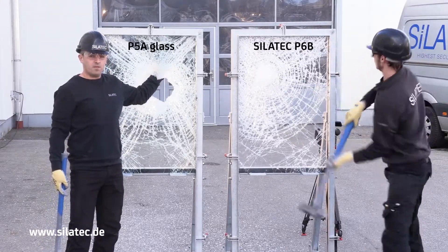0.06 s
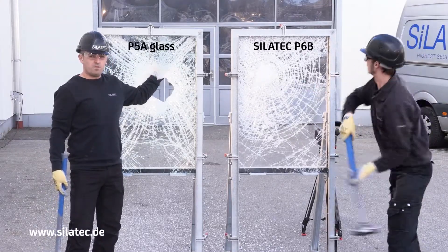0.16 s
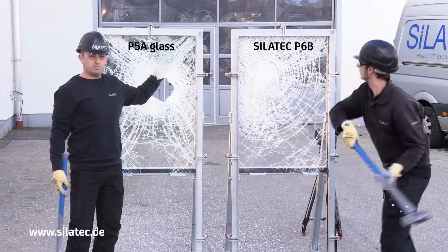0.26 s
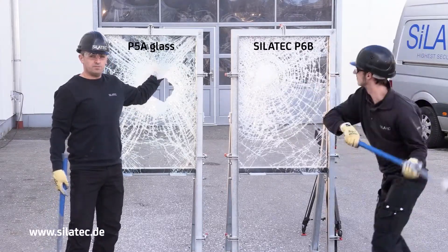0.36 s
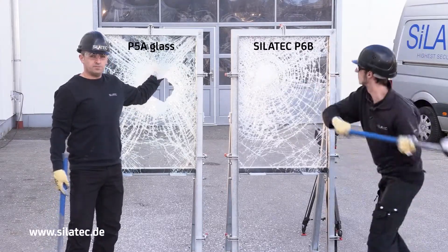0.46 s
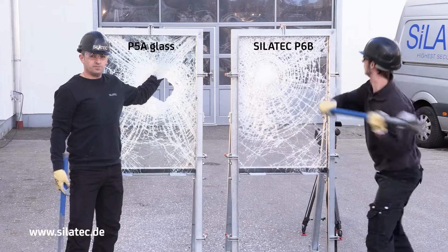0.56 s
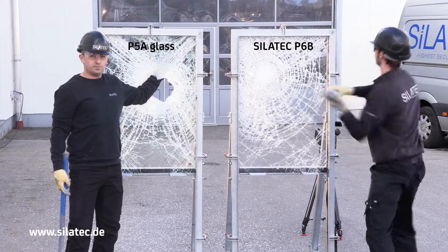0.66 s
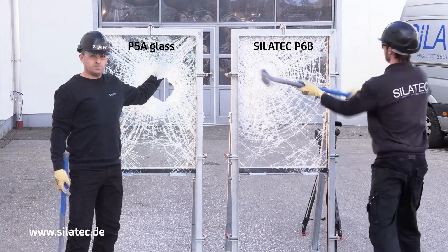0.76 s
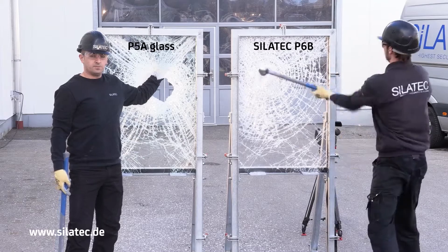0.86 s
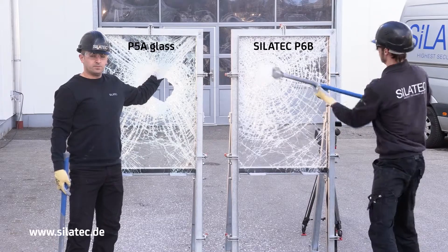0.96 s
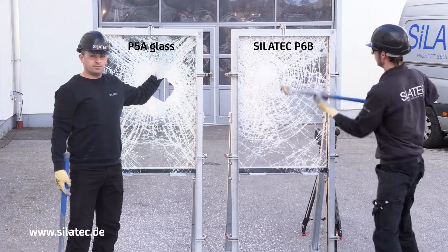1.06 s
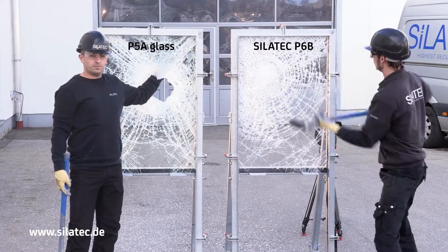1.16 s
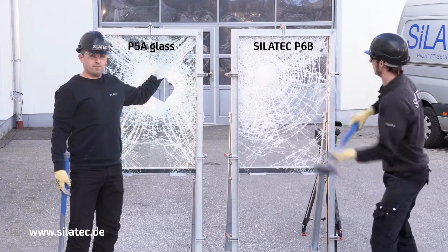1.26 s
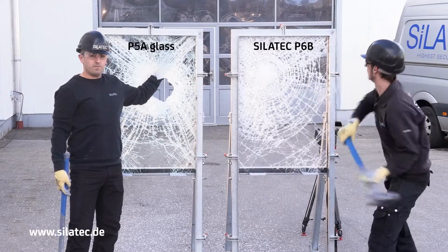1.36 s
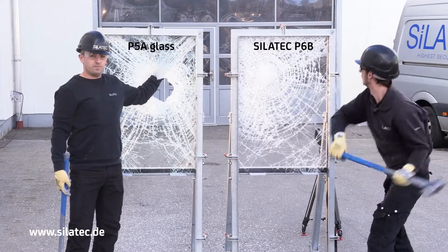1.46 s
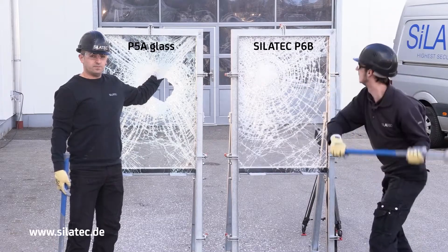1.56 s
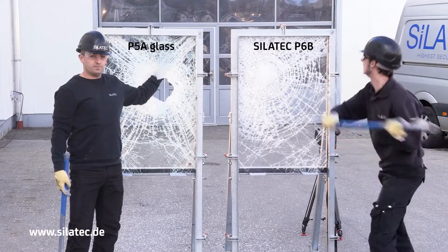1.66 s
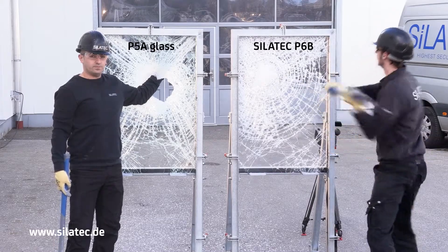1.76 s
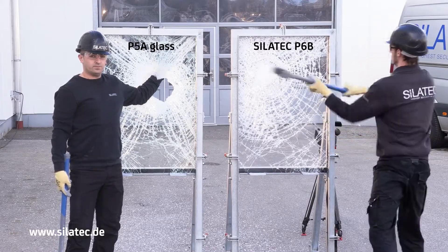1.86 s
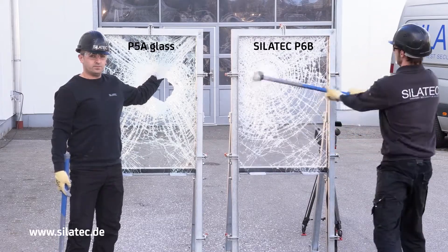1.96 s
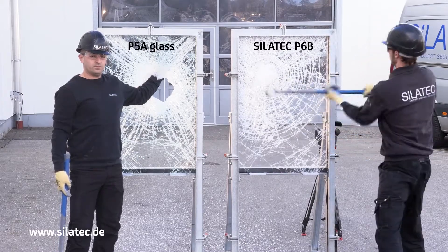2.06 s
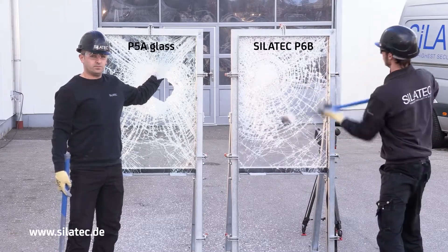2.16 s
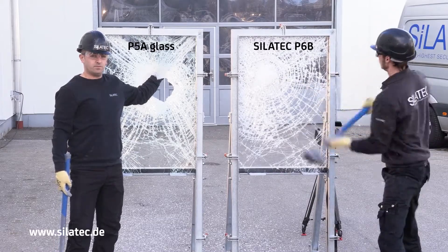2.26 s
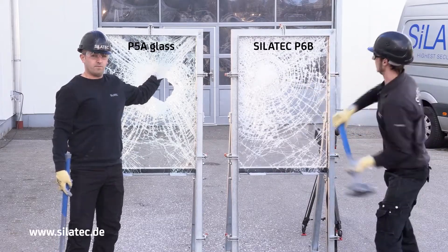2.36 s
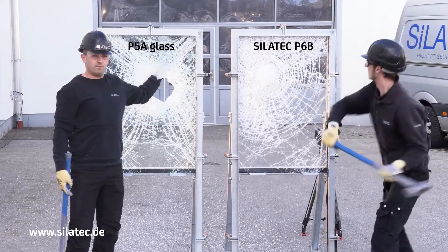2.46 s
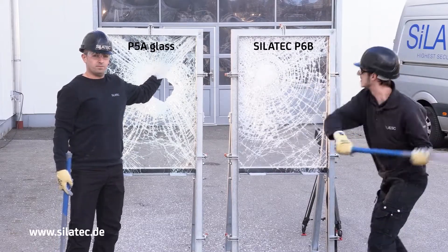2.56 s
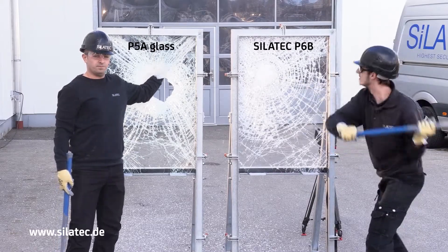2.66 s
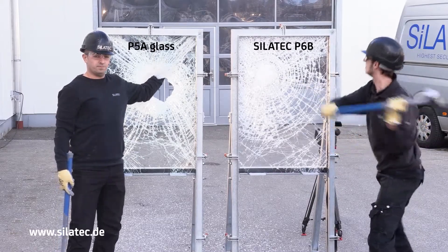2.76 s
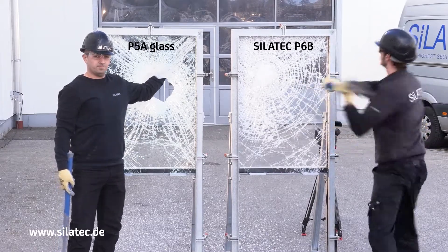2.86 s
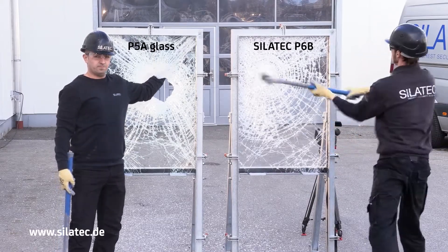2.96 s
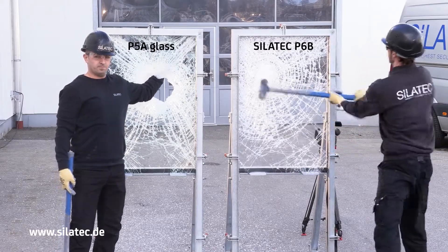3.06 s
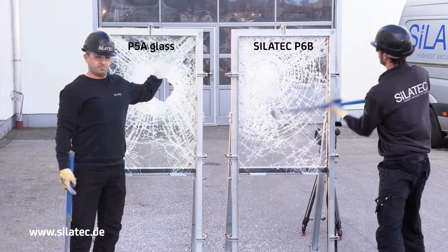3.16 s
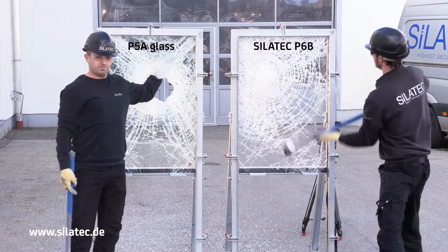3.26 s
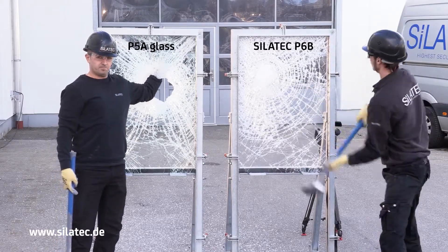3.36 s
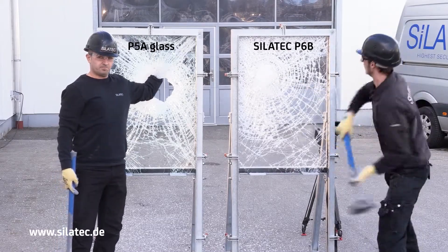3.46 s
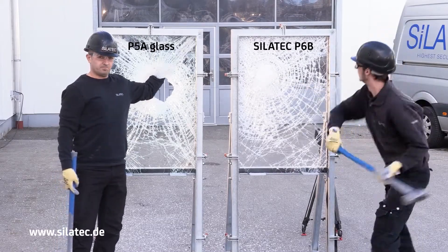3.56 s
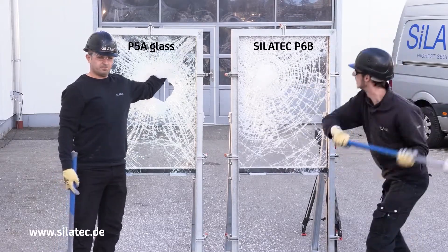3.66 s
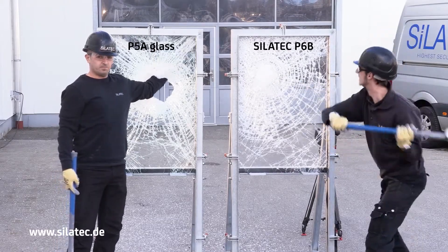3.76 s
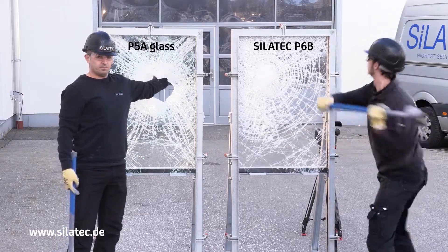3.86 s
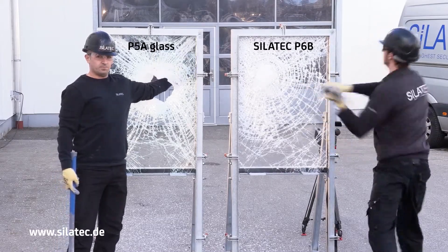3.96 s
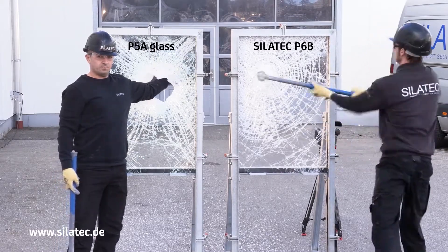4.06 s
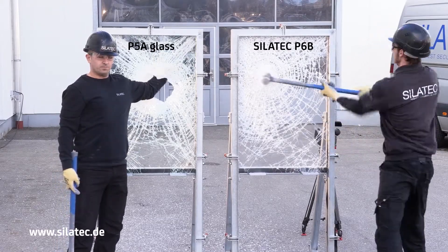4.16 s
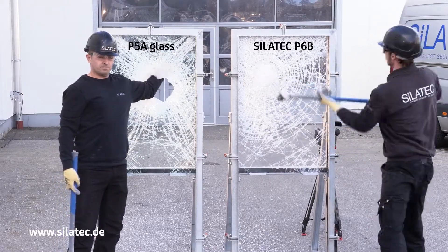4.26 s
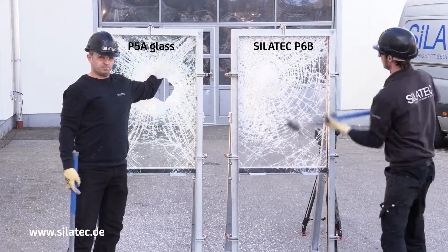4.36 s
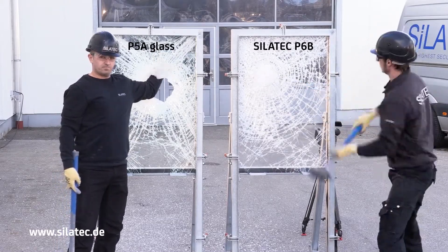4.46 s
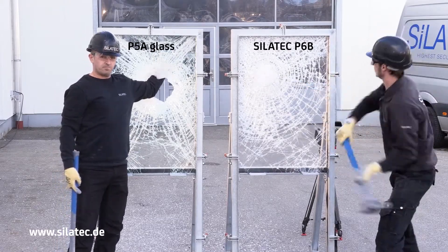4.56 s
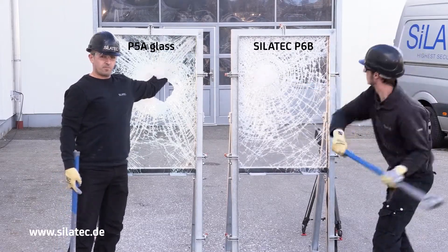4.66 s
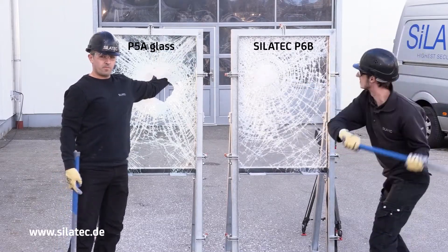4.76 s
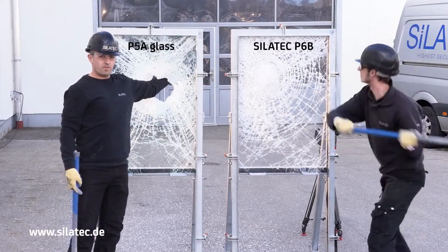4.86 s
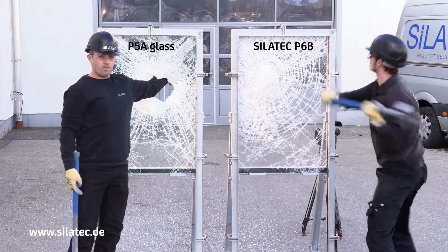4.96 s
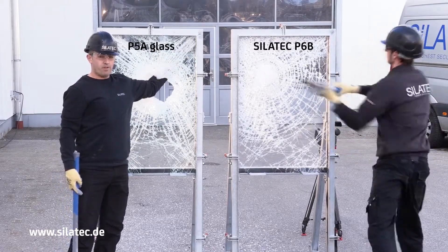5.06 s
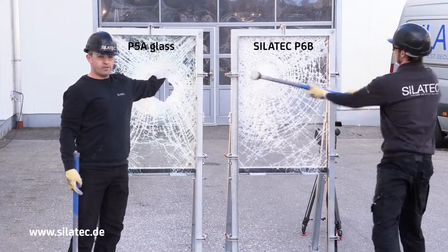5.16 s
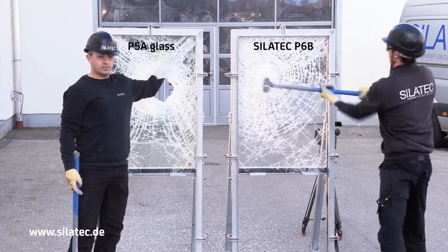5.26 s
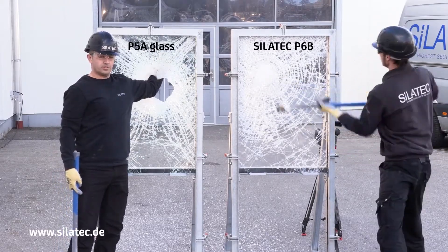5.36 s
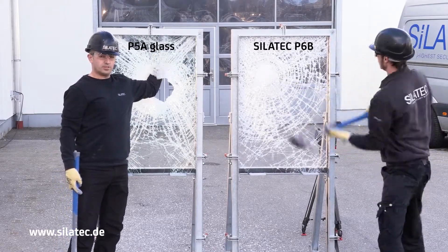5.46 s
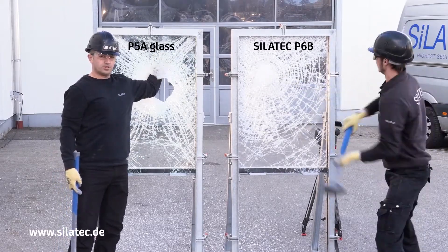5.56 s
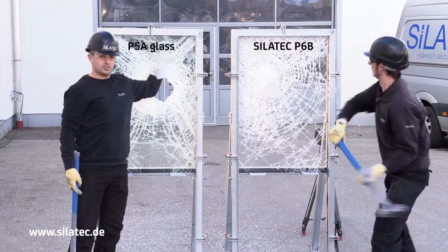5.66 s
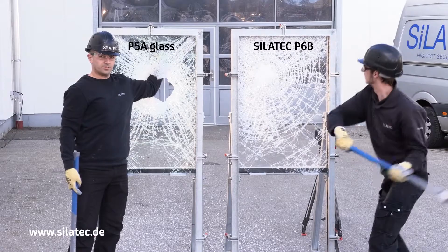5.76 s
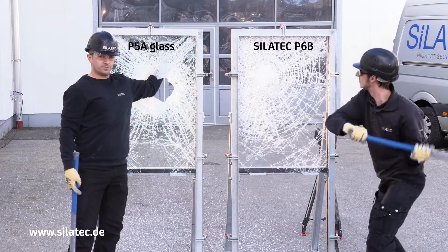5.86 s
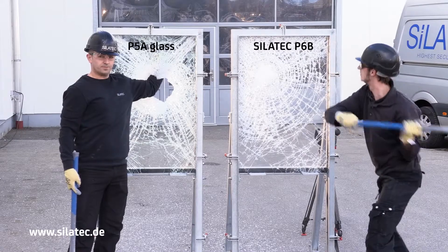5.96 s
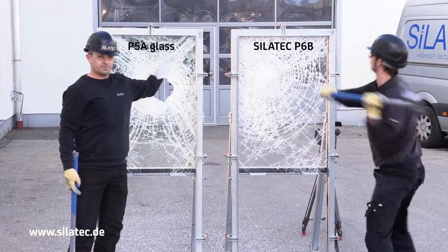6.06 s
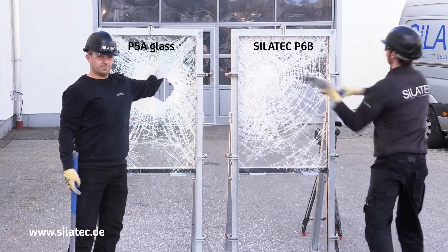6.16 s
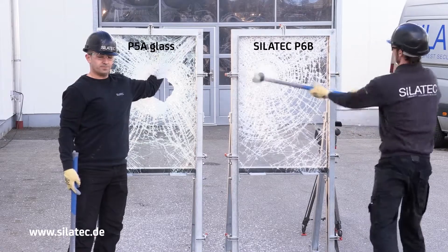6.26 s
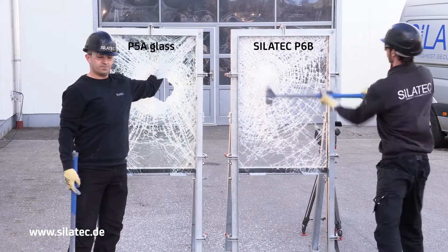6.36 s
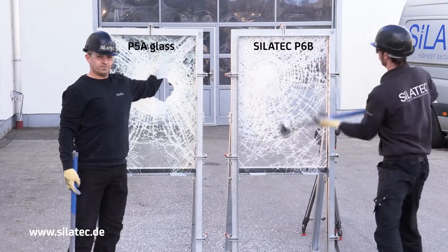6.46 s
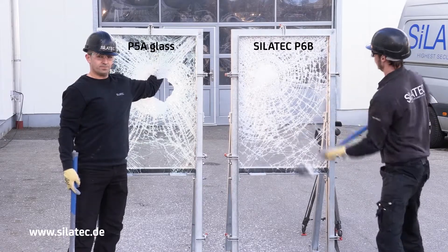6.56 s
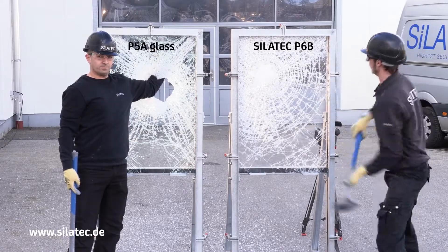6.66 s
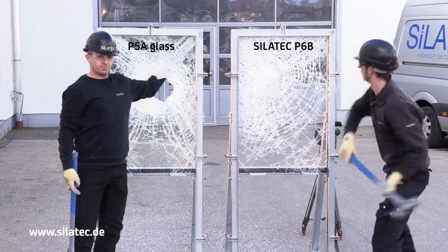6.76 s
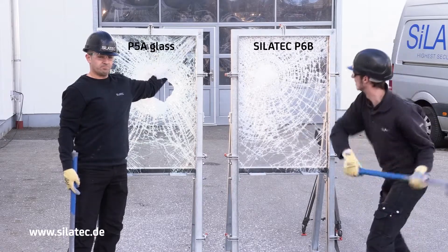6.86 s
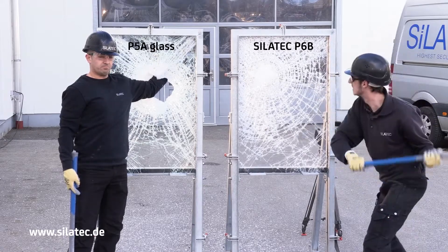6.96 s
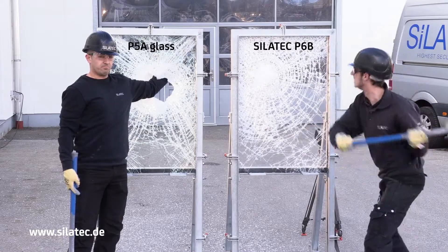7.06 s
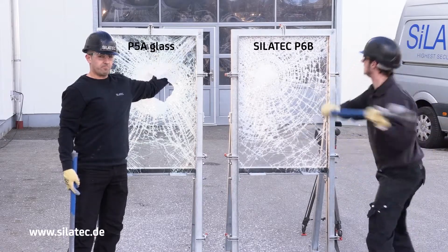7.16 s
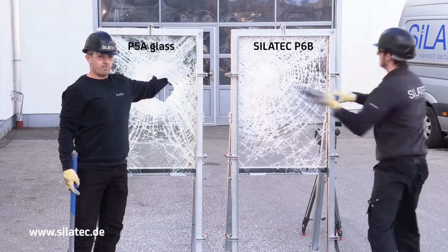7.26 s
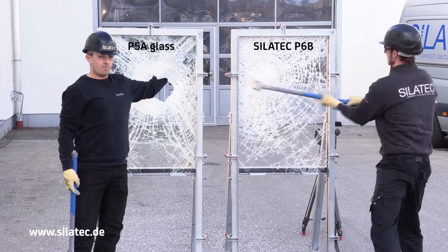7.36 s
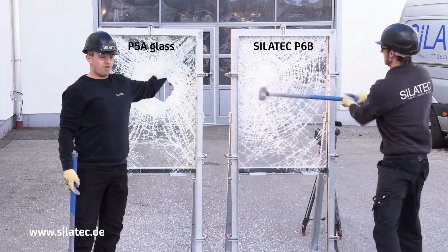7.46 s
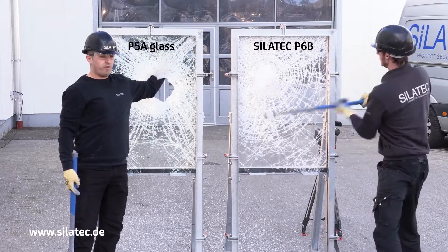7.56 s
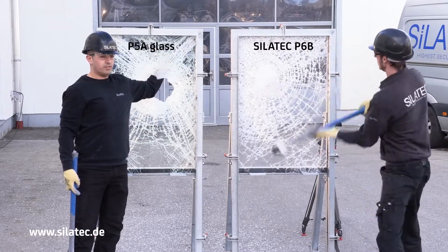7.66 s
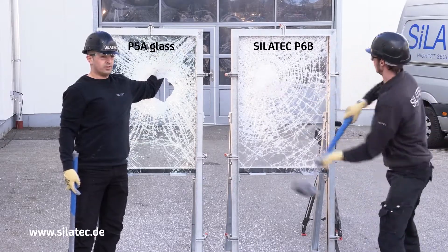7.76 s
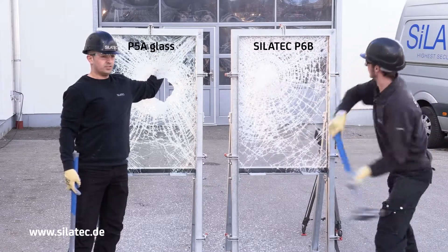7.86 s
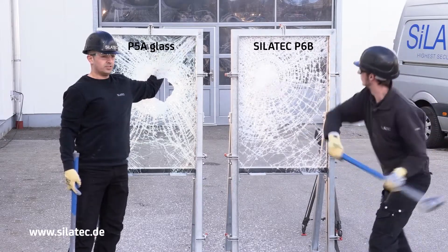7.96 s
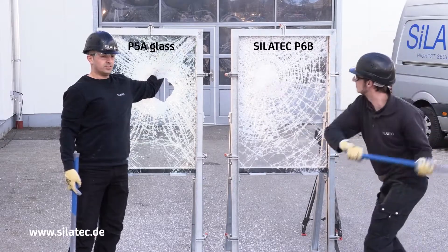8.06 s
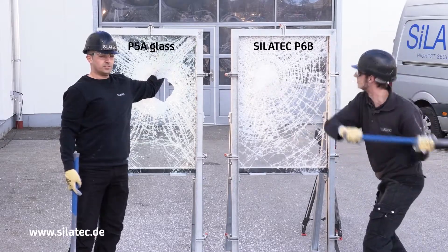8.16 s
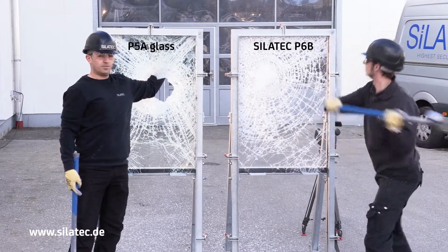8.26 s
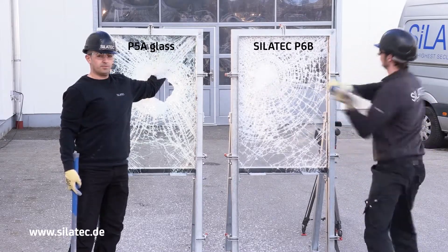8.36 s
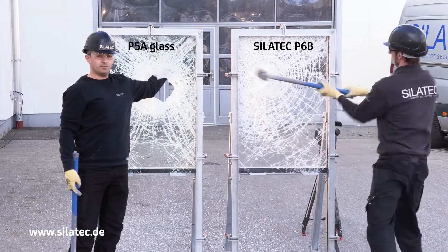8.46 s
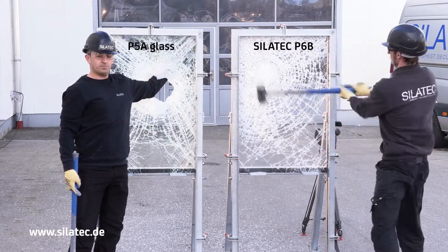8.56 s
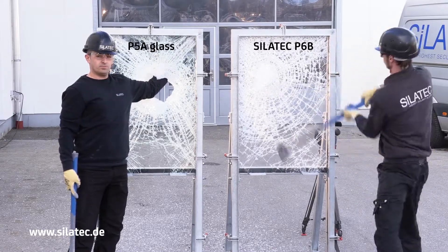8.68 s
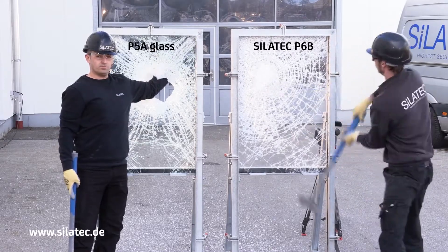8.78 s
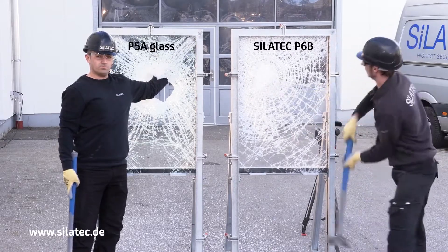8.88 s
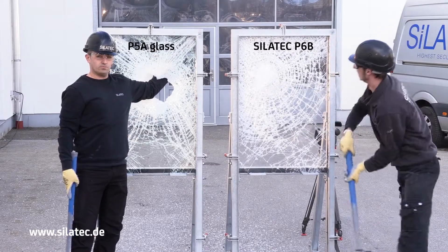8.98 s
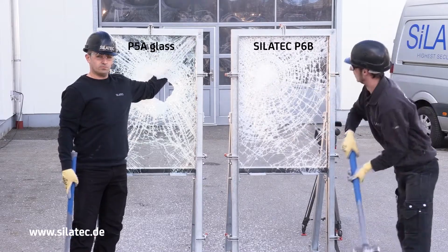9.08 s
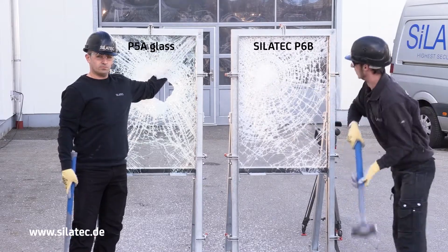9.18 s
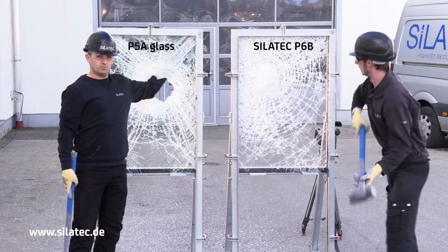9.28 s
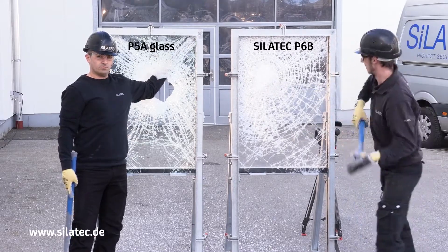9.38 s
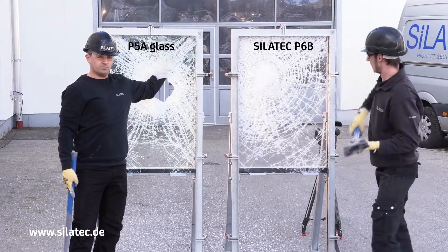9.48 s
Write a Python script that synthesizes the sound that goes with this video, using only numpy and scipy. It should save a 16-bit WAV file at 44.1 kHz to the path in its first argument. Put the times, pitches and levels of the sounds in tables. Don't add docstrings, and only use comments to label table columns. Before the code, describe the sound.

In a paved yard between walls, the clip opens on the dying tail of an earlier blow, with glass bits ticking down at 0.3-0.5 seconds. A sledgehammer then strikes a crazed laminated pane at about 0.9, 2.0, 3.1, 4.1, 5.2, 6.3, 7.4 and 8.6 seconds. Each hit is a dull, quickly damped thud with a bright gritty crunch, the first crunchiest, plus a faint steel frame rattle and slapback dying over half a second. Roughly 0.4-0.5 seconds after each, shards click, chime and skitter on paving; prominent landings come near 4.8, 5.76 and 6.8. Clothes rustle just before every blow. From 9.0 to 9.5 the last splinters tinkle, with a sole scuff, cloth movement and low wind puffs. Quiet traffic hum and light wind run throughout, picked up a few metres away.

```python
import sys
import numpy as np
from scipy import signal
from scipy.io import wavfile
from scipy.ndimage import uniform_filter1d

SR = 44100
rng = np.random.default_rng(int(sys.argv[2]) if len(sys.argv) > 2 else 0)


def persist_wave(psi):
    counts = np.round(np.clip(psi, -1, 1) * 32767).astype(np.int16)
    wavfile.write(sys.argv[1], SR, np.atleast_2d(counts).T)


def natural_amplitude(level_db):
    exponent = np.asarray(level_db, float) / 20
    return 10 ** exponent


N = 419816
LEAD = 13230


def rms_one(x):
    return x / np.sqrt(np.mean(x ** 2) + 1e-20)


def at_hz(table, hz):
    f, *columns = np.transpose(table)
    return [np.interp(np.log(hz), np.log(f), c) for c in columns]


def sides(pan_db):
    return natural_amplitude(np.array([[pan_db / 2], [-pan_db / 2]]))


def blank():
    return np.zeros((2, N + LEAD))


def add(out, x, s):
    i = LEAD + round(s * SR)
    out[..., i:i + x.shape[-1]] += x[..., :out.shape[-1] - i]


def click(n):
    return 1. * (np.arange(n) == 0)


def ring(clicks, hz, t60):
    r, w = natural_amplitude(-60 / (t60 * SR)), 2 * np.pi * hz / SR
    return signal.lfilter([0, np.sin(w)], [1, -2 * r * np.cos(w), r * r], clicks + 1e-18)


def drift(rate_hz):
    r = np.exp(-80 * np.pi * rate_hz / SR)
    slow = signal.lfilter([1], [1, -2 * r, r * r], rng.standard_normal(N // 40 + 2002))[2000:]
    return np.interp(np.arange(N) / 40, np.arange(len(slow)), rms_one(slow))


def band(x, low_hz, high_hz):
    return signal.sosfilt(signal.butter(2, [low_hz, min(high_hz, SR * .45)], "band", fs=SR, output="sos"), x)


SPOT_HZ = [330, 570, 780, 1500, 2100, 2900, 5000]
SPOTS = [(0.31, -0.37, 0.11, 1.7, 0.1), (-1.1, 0.049, 0.11, 2.4, 0.086), (-1.5, -0.2, 0.1, 0.5, 0.1),
         (0.43, 1.4, 0.1, 0.37, 0.1), (-1.5, 1.7, 0.11, 0.8, 2.2), (1, 0.3, 0.1, 1, 0.1),
         (0.1, 0.44, 1.7, 0.67, 0.74), (0.52, -0.31, 0.1, 0.6, 0.1), (0.34, 0.066, 1.6, -0.014, 0.095)]


def spot_db(blow, hz):
    return np.interp(np.log(hz), np.log([180, *SPOT_HZ]), [0, *SPOTS[blow], 0, 0])


# (frequency [Hz], level [dB], t60 [s])
PANE = [(137, -24, 0.058), (331.3, -17.5, 0.07), (462, -34.5, 0.074), (558, -25, 0.16), (595, -23, 0.3),
        (698, -22, 0.12), (863, -16.5, 0.042)]
THUD_S, THUD_DB = .00034, -2


def pane_thud(blow, pane_db, place, t):
    push = np.sin(np.pi * np.minimum(t / THUD_S, 1))
    thud = natural_amplitude(THUD_DB) * band(push, 150, 9000)
    for (hz, db, t60), d, off in zip(PANE, place, place[60:]):
        level = natural_amplitude(db + pane_db + 2 * spot_db(blow, hz) + 2 * d)
        thud = thud + level * ring(push / push.sum(), hz * (1 + .026 * off), t60)
    return thud


CRUNCH_DB = -13.5


def glass_crunch(crunch_db, grit, size, t):
    uneven = grit * natural_amplitude(4 * np.clip(size, -2, 2))
    splinters = uneven * natural_amplitude(-60 * t / 0.016) * np.clip(t / 0.0014 - .4, 0, 1)
    return natural_amplitude(CRUNCH_DB + crunch_db) * band(splinters, 1400, 11000)


# (delay [s], level [dB])
BOOMS = [
    (0, -14),
    (0.0164, -21.5),
    (0.069, -17.5),
    (.085, -22.5),
    (0.142, -34),
    (.181, -35),
    (.266, -48),
]
BOOM_HZ, BOOM_T60_S = 165.1, 0.027


def boom(out, s, strength_db, t):
    swing = ring(ring(click(len(t)), BOOM_HZ, BOOM_T60_S), BOOM_HZ, BOOM_T60_S)
    for delay, db in BOOMS:
        add(out, -natural_amplitude(db + strength_db) * sides(-.6) * swing / abs(swing).max(), s + delay)


# (frequency [Hz], level [dB], t60 of the rattle [s])
FRAME = [(837, -31.5, 0.48), (1507, -34.5, 0.47), (1916, -35.5, 0.29), (2022, -37.5, 0.57),
         (2110, -39, 0.38), (2170, -53, 0.14), (2770, -39.5, 0.59), (2863, -37.5, 0.46), (3080, -39, 0.49),
         (3677, -36.5, 0.39)]


def frame_hum(out, blow, s, strength_db, grit, size, place, t):
    for (hz, db, t60), d in zip(FRAME, place[40:]):
        fits = rms_one(uniform_filter1d(np.roll(grit, int(hz)), size=900))
        rattle = size * natural_amplitude(1.8 * fits - 3) * natural_amplitude(-60 * t / t60) * .09
        hum = ring(rattle, hz * (1 + .012 * d), .036)
        level_db = db + strength_db + 7.0 + 2 * spot_db(blow, hz) - 0.31 * abs(d)
        add(out, natural_amplitude(level_db) * sides(2 + 2.9 * d) * hum, s)


# (time [s], strength [dB], pane ring [dB], crunch [dB], wall crack [dB])
BLOWS = [
    (-.26, 2.5, 14, 4, 0),
    (0.8646, -2.5, 3, 10, -1.5),
    (1.9981, -2, 2, 1.5, 1),
    (3.0685, -2.5, -3.5, -0.5, 2),
    (4.143, -2, 0.5, 3.5, 2),
    (5.2272, -1.5, 0.5, 4, 2),
    (6.3164, -2, 1.5, 2.5, 4),
    (7.4487, -2, 0.5, 2.5, 0.5),
    (8.5701, -3, 3.5, 5, 1.5),
]
# (delay [s], thud [dB], crunch [dB], crack [dB], left-right [dB], sign [factor])
ECHOES = [(0, 3.5, 9.5, -13, -1.5, 0.44), (.0057, -6, -10, -5.5, 1.5, 0.92),
          (.0091, -16.5, -1, -11, -1, -1), (.0119, -8, -7.5, 0.5, -1, 1), (.0154, -17, -10, -9, 5, -1.1),
          (.0176, -16.5, -5.5, -24.5, 12.5, 0.52), (.0225, -32, -4, -6.5, 11.5, 0.56),
          (.0405, -21.5, -28, -15, 7.5, -0.36), (.052, -18.5, -26.5, -23, -1.5, 0.75),
          (.066, -15, -22.5, -43, 1.5, 0.83), (.091, -2.5, -31, -54, -2, -0.9), (.19, -18, -42, -36, 10, 1)]
SNAPS_DB = [-12, -7, -13, -14, -3, -8, -3, -11, -16]
CRACK_DB, WALL_EXTRA_S = 6.5, .0003


def blows():
    out, t = blank(), np.arange(SR // 2) / SR
    luck = rng.standard_normal((len(BLOWS), 3, len(t)))
    for blow, (s, strength_db, pane_db, crunch_db, crack_db) in enumerate(BLOWS):
        grit, size, place = luck[blow]
        thud = pane_thud(blow, pane_db, place, t)
        crunch = glass_crunch(crunch_db, grit, size, t)
        crack = natural_amplitude(CRACK_DB + crack_db) * band(click(len(t)), 420, 7000)
        snap = natural_amplitude(CRACK_DB + SNAPS_DB[blow]) * band(click(len(t)), 300, 4500)
        add(out, snap, s + .0005)
        for k, (delay, thud_db, echo_db, front_db, pan_db, sign) in enumerate(ECHOES):
            dull = np.exp(-2 * np.pi * 900 / (SR * (delay / 0.015 + 1e-3)))
            far = natural_amplitude(thud_db) * signal.lfilter([1 - dull], [1, -dull], thud)
            sharp = natural_amplitude(echo_db + 0.69 * place[20 + k]) * crunch + natural_amplitude(front_db) * crack
            echo = natural_amplitude(strength_db) * sign * (far + sides(pan_db) * sharp)
            add(out, echo, s + delay + WALL_EXTRA_S * (k > 1))
        boom(out, s, strength_db, t)
        frame_hum(out, blow, s, strength_db, grit, size, place, t)
    return out[:, LEAD:]


# (frequency [Hz], level at the blow [dB per Hz], t60 [s], late level [dB], late t60 [s])
YARD = [(40, -89, .2, -12.5, 0.9), (120, -52, 0.84, -21.5, 0.85), (243, -58.5, 0.86, -16.5, 0.9),
        (340, -52.5, 0.7, -14.5, 0.95), (590, -49.5, 0.43, -15.5, 1.), (1200, -55.5, 0.52, -15.5, 1),
        (2500, -56, 0.41, -21.5, 0.94), (5000, -60, 0.3, -7.5, 0.57), (7300, -59.5, 0.45, -10, 0.62),
        (11900, -64.5, 0.29, -24, 0.47), (15500, -71, 0.17, -31.5, .3)]


def yard_gain(hz):
    db, t60, late_db, late_t60 = at_hz(YARD, hz)
    power, t = np.zeros(N + LEAD), np.arange(2 * SR) / SR
    decay = natural_amplitude(-120 * t / t60) + natural_amplitude(2 * late_db - 120 * t / late_t60)
    shape = decay * np.minimum(t / (0.0056 + 7.2 / hz), 1) ** 2
    for blow, (s, strength_db, *_) in enumerate(BLOWS):
        add(power, shape * natural_amplitude(2 * (strength_db + spot_db(blow, hz))), s)
    return power[LEAD:] * natural_amplitude(2 * db)


# (frequency [Hz], likeness [0..1])
LIKENESS = [(60, 0.67), (100, 1), (180, 1), (310, 1), (550, 0.94), (950, 0.89), (1650, 0.31), (2860, 0.031),
            (4970, 0.42), (8640, 0.73), (15000, 0.78)]
# (frequency [Hz], left-right [dB])
SIDEWAYS = [(60, -0.5), (180, -0.5), (550, -0.5), (1650, 0), (4970, 3.5), (15000, -3.5)]


def air(gain_at):
    out, edges = 0, 28 * 2 ** np.arange(0, 9.3, .4)
    white = rng.standard_normal((2, 2, N)) * np.sqrt(SR / 4)
    for k, (low, high) in enumerate(zip(edges, edges[1:])):
        mid, side = band(white[k % 2], low, high)
        hz = np.sqrt(low * high)
        alike = np.clip(at_hz(LIKENESS, hz)[0], 0, 1)
        pair = np.sqrt(1 + alike) * mid + np.sqrt(1 - alike) * side * [[1], [-1]]
        out = out + gain_at(hz) * sides(at_hz(SIDEWAYS, hz)[0]) * pair
    return out


# (frequency [Hz], level [dB per Hz])
FLOOR = [(30, -100), (58, -103), (90, -89.5), (125, -91), (190, -89.5), (280, -98), (395, -94.5),
         (600, -97), (1000, -98), (1500, -100), (2300, -107), (4000, -114), (6300, -108), (8000, -106),
         (11500, -106), (13000, -134)]
# (frequency [Hz], level [dB per Hz])
RUSTLE = [(800, -12.5), (2000, -4.5), (4000, -4), (6200, -6), (7500, 1.5), (10000, -18), (13500, -35)]
# (frequency [Hz], level [dB per Hz])
DUST = [(3000, -48), (6000, -9), (9000, 4), (12500, -4), (14500, -27.5)]


def diffuse(rustle_db, trickle_db):
    swell = natural_amplitude(1.5 * drift(2.5))
    uneven = 2.5 * drift(90) + .8 * drift(14)
    crease, grain = 1.6 * drift(30), 2.4 * drift(70)
    flutter = natural_amplitude(2 * (rustle_db - 31 + crease))
    sift = natural_amplitude(2 * (trickle_db - 24.5 + grain))

    def gain_at(hz):
        tail = yard_gain(hz) * natural_amplitude(uneven * np.clip(hz / 2500, 1, 1.45))
        floor = natural_amplitude(2 * at_hz(FLOOR, hz)[0]) * swell
        cloth = natural_amplitude(2 * at_hz(RUSTLE, hz)[0]) * flutter
        dust = natural_amplitude(2 * at_hz(DUST, hz)[0]) * sift
        return np.sqrt(tail + floor + cloth + dust) * natural_amplitude(1.2 * drift(11.0))
    return air(gain_at)


# (frequency [Hz], level [dB], t60 [s])
HUM = [(56.2, -68.5, 0.42), (211, -73, 0.16), (400, -74.5, 0.71)]


def engines():
    return sum(natural_amplitude(db) * rms_one(ring(rng.standard_normal(N), hz, t60)) for hz, db, t60 in HUM)


# (time [s], length [s], level [dB])
GUSTS = [
    (8.116, 0.24, -51),
    (8.375, 0.035, -52.5),
    (8.474, 0.027, -47),
    (9.106, 0.068, -49),
    (9.297, 0.1, -53.5),
    (9.4, 0.071, -53),
]


def wind(wind_db):
    puff = rng.standard_normal((2, N))
    lumps = rms_one(band(puff[0] + .12 * puff, 49, 272)) * natural_amplitude(1.9 * drift(30))
    low = rms_one(band(rng.standard_normal(N), 69, 164))
    deep = rms_one(band(np.tanh(2 * low), 60, 290))
    t = np.arange(N) / SR
    gusts = sum(natural_amplitude(db) * np.sin(np.pi * np.clip((t - s) / length, 0, 1)) for s, length, db in GUSTS)
    return natural_amplitude(wind_db - 6.5) * lumps + gusts * deep


# (time [s], level [dB])
BREEZE = [(0, -46), (.3, -59.5), (.72, -60), (1.75, -65), (1.95, -75), (2.9, -83), (4.05, -80.5),
          (5.1, -76.5), (5.95, -63.5), (6.25, -83), (7.3, -100), (8.05, -73), (8.25, -53), (8.44, -64),
          (8.5, -55), (9.12, -64), (9.22, -75), (9.5, -45.5)]
# (fall time [s], swell [s], trickle [dB], fading [dB per s], dust rustle [dB])
SHOWERS = [
    (0.53, 0.15, -67.5, 109, -65.5),
    (0.49, 0.11, -73, 59, -71),
    (0.42, 0.19, -68.5, 66.5, -81),
    (0.48, 0.098, -65.5, 46, -92.5),
    (0.43, 0.16, -67.5, 36.5, -86.5),
    (0.42, 0.15, -62.5, 99, -65),
    (0.46, 0.046, -67.5, 50, -77.5),
    (0.33, 0.35, -70, 57, -72.5),
    (0.45, 0.024, -71.5, 29, -68.5),
]
# (start [s], end [s], level [dB])
SWINGS = [
    (0.756, 0.859, -63),
    (1.789, 1.998, -64),
    (2.87, 3.071, -65.5),
    (3.988, 4.11, -65.5),
    (5.07, 5.228, -67.5),
    (6.2, 6.328, -68),
    (7.26, 7.445, -58.5),
    (8.382, 8.57, -61.5),
    (9.172, 9.354, -62.5),
]
SHOWER_START_DB = -15
DUST_FADES = 0.92
SWING_RISE_S, SWING_SHEEN_DB = 0.061, -13.5
STILL_RUSTLE_DB, STILL_TRICKLE_DB = -86, -94
SETTLE_DB, SETTLE_DB_PER_S = -63, 32
SPALL_DB, SPALL_DB_PER_S = -58.5, 90.5
RUMBLE_DB, RUMBLE_DB_PER_S = -48.5, 28.5


def stir():
    t = np.arange(0, N, 32) / SR
    rustle, trickle = natural_amplitude(STILL_RUSTLE_DB + 0 * t), natural_amplitude(STILL_TRICKLE_DB + 0 * t)
    wind_amp = natural_amplitude(np.interp(t, *np.transpose(BREEZE)))
    for (s, *_), (fall, swell, db, fade_db, dust_db) in zip(BLOWS, SHOWERS):
        since = t - s - fall
        rise_db = SHOWER_START_DB * np.clip(1 - since / swell, 0, 1)
        landed, past = np.clip(since / .015, 0, 1), np.maximum(since - swell, 0)
        struck, age = t > s, abs(t - s)
        trickle = trickle + landed * natural_amplitude(db + rise_db - fade_db * past)
        rustle = rustle + landed * natural_amplitude(dust_db + rise_db - DUST_FADES * fade_db * past)
        rustle = rustle + struck * natural_amplitude(SETTLE_DB - SETTLE_DB_PER_S * age)
        trickle = trickle + struck * natural_amplitude(SPALL_DB - SPALL_DB_PER_S * age)
        wind_amp = wind_amp + struck * natural_amplitude(RUMBLE_DB - RUMBLE_DB_PER_S * age)
    for start, end, db in SWINGS:
        inside = np.minimum(t - start, end + SWING_RISE_S - t)
        sweep = natural_amplitude(db) * np.clip(inside / SWING_RISE_S, 0, 1) ** 2
        rustle, trickle = rustle + sweep, trickle + natural_amplitude(SWING_SHEEN_DB) * sweep
    return [np.interp(np.arange(N) / SR, t, 20 * np.log10(v)) for v in (rustle, trickle, wind_amp)]


CRUMBS_PER_S, CRUMB_DB, CRUMB_T60_S = 90, 28, .05


def crumbs(trickle_db):
    sizes = natural_amplitude(5.5 * np.minimum(rng.exponential(1, N), 4)) * (rng.random(N) < 150 / SR)
    pitches, dealt = rng.uniform(8400, 15600, 20), rng.integers(0, 20, N)
    tiny = 0
    for k, hz in enumerate(pitches):
        tiny = tiny + ring(sizes * (dealt == k) * natural_amplitude(trickle_db), hz, 900 / hz) * sides(6 * np.cos(k))
    hits = rng.random(N) < CRUMBS_PER_S / SR
    hits = hits * natural_amplitude(CRUMB_DB + trickle_db + 4.0 * rng.standard_normal((2, N)))
    pings = sum(ring(hits * (dealt == k), hz, CRUMB_T60_S) for k, hz in enumerate(rng.uniform(3800, 7000, 10)))
    return natural_amplitude(-3) * tiny + band(hits + 1e-18, 3000, 16000) + .07 * pings


# (time [s], frequency [Hz], level [dB], t60 [s], left-right [dB])
CHIMES = [(.116, 7062, -54, 0.082, 9), (0.42, 6580, -42, 0.13, 12), (.488, 6670, -54, 0.11, 0),
          (2.32, 5000, -54, 0.04, 2), (2.397, 4930, -53, 0.056, 7), (2.592, 5190, -63, 0.2, 4),
          (5.7255, 5400, -43, 0.14, 3), (5.761, 2500, -48, .05, -1), (5.762, 4400, -49, 0.098, 0),
          (5.764, 3820, -54, 0.11, 0), (5.77, 7100, -46, .12, 7), (5.764, 6140, -47, 0.26, 5),
          (5.761, 1950, -44.5, 0.067, -1), (6.8675, 5630, -34, 0.037, -5.5), (6.892, 5700, -44, 0.072, 3),
          (6.908, 5620, -44, 0.087, 6), (6.931, 5600, -56.5, 0.37, -3), (7.86, 2200, -59, 0.15, 0),
          (8.059, 3870, -58, 0.069, 8), (7.87, 4900, -56, 0.11, 7), (9.403, 6400, -55, 0.086, 4)]


def chimes():
    out, t = blank(), np.arange(SR // 2) / SR
    for (s, hz, db, t60, pan_db), grit in zip(CHIMES, rng.standard_normal((len(CHIMES), len(t)))):
        touches = (t == 0) + 0.007 * grit * natural_amplitude(-30 * t / t60)
        add(out, natural_amplitude(db) * sides(pan_db) * band(ring(touches, hz, t60), hz - 170, hz + 170), s)
    return out[:, LEAD:]


# (time [s], frequency [Hz], level [dB], t60 [s])
PINGS = [(.195, 6940, -54, .08), (.428, 3860, -56, 0.059), (.55, 6550, -62, 0.13), (1.35, 5880, -56, .04),
         (1.63, 6040, -61, 0.11), (1.655, 6700, -57, 0.06), (1.747, 5960, -61.5, .09),
         (2.615, 3960, -58, 0.056), (2.645, 5200, -60, .07), (2.755, 5200, -65, 0.15),
         (2.81, 5200, -64, 0.076), (3.635, 4100, -62, 0.2), (4.795, 7600, -43, .06),
         (5.548, 5000, -51, 0.061), (5.64, 4860, -61, .09), (5.686, 5200, -59, .14), (5.83, 3770, -62, 0.1),
         (5.835, 2000, -56, .08), (6.198, 5100, -59, .07), (6.785, 6600, -57, .07), (6.973, 6480, -64, .06),
         (7.712, 4050, -57, 0.043), (5.79, 5360, -52, .25), (7.85, 6120, -55, 0.063),
         (7.848, 5460, -60, .07), (8.012, 7950, -54, .1), (8.935, 4070, -60, 0.077),
         (9.063, 4000, -58, 0.09), (9.222, 4000, -63, .04)]


def chip_pings():
    out, t = blank(), np.arange(4000) / SR
    for (s, hz, db, t60), grit in zip(PINGS, rng.standard_normal((len(PINGS), len(t)))):
        touches = (t == 0) + .025 * grit * natural_amplitude(-40 * t / t60)
        ping = ring(touches, hz, .7 * t60) * np.cos(t / t[-1] * np.pi / 2)
        add(out, natural_amplitude(db) * sides(2 + 2 * grit[0]) * band(ping, .9 * hz, 1.1 * hz), s)
    return out[:, LEAD:]


# (time [s], frequency [Hz], level [dB], rocking [s])
SLIVERS = [(.42, 12400, -38, .05), (.45, 10700, -51, 0.18), (0.688, 12950, -49, 0.064),
           (1.433, 10680, -42, .04), (1.5, 10700, -47, 0.043), (2.49, 12150, -46, 0.032),
           (2.635, 12600, -36, .08), (2.785, 12700, -47, 0.092), (2.69, 11900, -51, .15),
           (2.71, 9900, -50, .1), (3.555, 11700, -45.5, .05), (3.62, 11000, -36, .02),
           (3.65, 10800, -36, 0.04), (3.63, 13800, -39, .15), (3.83, 9240, -40, 0.13),
           (3.81, 12900, -47, .27), (4.64, 8785, -39, .4), (4.72, 8100, -45, .33),
           (4.77, 13800, -38, 0.046), (4.85, 10330, -39, 0.073), (5.79, 13200, -46, .1),
           (6.818, 9650, -31.5, 0.1), (6.875, 9230, -47, .12), (6.87, 10700, -42, 0.061),
           (6.99, 13900, -40, 0.11), (7.089, 9646, -50, 0.26), (8.03, 12800, -40, 0.073),
           (9.092, 11500, -44, .08), (9.281, 12700, -47, 0.062), (9.402, 10880, -45, 0.11),
           (.293, 11300, -54, .01), (.498, 12100, -47, .02), (.54, 10700, -48, 0.055),
          (1.38, 12600, -52, .03), (1.57, 9750, -56, .09), (1.82, 11900, -54, .01), (1.55, 13900, -46, .03),
          (1.62, 14600, -44, .03), (2.5, 15500, -39, .06), (2.59, 15200, -38.5, .02),
          (2.61, 10600, -39, .01), (3.545, 9400, -52, .01), (3.74, 9330, -44, .02), (3.945, 9370, -41, .1),
          (4.78, 13000, -46, .03), (5.14, 12100, -54, .03), (5.185, 14000, -42, .02),
          (5.555, 12800, -52, .05), (4.84, 15600, -40.5, .02), (5.7, 11500, -46, .02),
          (5.83, 11700, -49, .03), (5.83, 9000, -52, .02), (5.9, 8700, -51, 0.047),
          (6.005, 10700, -54, .04), (6.04, 9500, -53, 0.045), (6.125, 12750, -48, .03),
          (6.155, 13900, -51, .02), (6.2, 10100, -53, .03), (6.765, 12900, -50, .02),
          (6.865, 15400, -42, .05), (6.96, 15500, -41.5, .04), (7.035, 10500, -46, .01),
          (7.14, 14100, -52, .04), (7.84, 9500, -59, .04), (8.425, 13800, -53, .07), (8.52, 8800, -49, .02),
          (9.08, 9400, -48, .05), (9.12, 14300, -43, .01), (4.7, 15200, -44, .05), (9.205, 11650, -42, .04),
          (9.367, 11700, -41, .02), (9.402, 9500, -43, .06), (9.49, 10900, -57, .03)]
SLIVER_T60_S, ROCKS_PER_S, ROCK_DB = 0.074, 67, -3


def slivers():
    out, t = blank(), np.arange(SR // 2) / SR
    pieces = SLIVERS
    for (s, hz, db, length), (when, size) in zip(pieces, rng.random((len(pieces), 2, len(t)))):
        rocks = (when < ROCKS_PER_S / SR) * (t < length)
        touches = (t == 0) + rocks * natural_amplitude(ROCK_DB - 6.5 * size - 4 * t / length)
        sing = band(ring(touches, hz, SLIVER_T60_S), 0.83 * hz, 1.1 * hz)
        add(out, natural_amplitude(db) * sides(12 * size[0] - 3) * sing, s)
    return out[:, LEAD:]


# (time [s], peak [dB], centre [Hz], left-right [dB])
TICKS = [(0.3536, -32.5, 7140, 4), (1.343, -51, 6030, 2), (1.4636, -40, 5200, -2), (1.486, -37, 5800, 4),
         (2.61, -42, 4000, 3), (3.6252, -31.5, 7150, -4), (3.7294, -47, 6530, 1.5), (3.8308, -39, 6140, 8),
         (4.621, -37.5, 6240, 1.5), (4.6452, -37, 5640, -1), (4.7664, -33, 6540, 12),
         (4.8111, -23, 6400, 7.5), (4.8648, -36.5, 6150, 9), (5.0668, -32.5, 6460, 7.5),
         (5.0722, -28, 5600, 6), (5.187, -36, 6040, 12), (5.692, -41, 6000, 1.5), (5.7613, -27, 5400, -8),
         (6.8189, -20.5, 5600, 4), (3.849, -39, 6240, 0), (9.0463, -41, 4860, 10), (9.2043, -35, 6030, 2),
         (9.4015, -39, 6270, 0)]
TICK_SHEEN_DB = 14.5


def ticks():
    out, t = blank(), np.arange(4000) / SR
    for (s, db, hz, pan_db), grit in zip(TICKS, rng.standard_normal((len(TICKS), len(t)))):
        contact = (t == 0) + .07 * grit * natural_amplitude(-60 * t / .02)
        tick = band(contact, 2900, 16000) + .08 * ring(click(len(t)), hz, .007)
        sheen = min(hz / 6000, 1) ** 4 - .5
        tick = tick + natural_amplitude(TICK_SHEEN_DB) * band(tick, 6500, 15500) * sheen
        add(out, natural_amplitude(db + 5) * sides(pan_db) * tick, s)
        add(out, natural_amplitude(db - 6) * sides(pan_db) * tick, s + .0058)
        add(out, natural_amplitude(db - 9) * sides(-pan_db) * tick, s + .0025)
    return out[:, LEAD:]


# (time [s], peak [dB])
FLECKS = [(0.3754, -53), (0.405, -42), (0.4474, -48), (0.7208, -48), (1.3977, -48), (1.5449, -53),
          (1.6167, -53), (2.4977, -51), (2.508, -47), (2.5624, -51), (2.6324, -39), (3.5548, -52),
          (3.5804, -56), (3.6062, -52), (3.6496, -43), (3.675, -42), (3.8157, -54), (3.9104, -56),
          (3.9335, -53), (3.9564, -54), (3.993, -49), (4.7194, -54), (4.8374, -44), (4.947, -59),
          (5.1255, -51), (5.5473, -54), (5.7227, -40), (5.7494, -40), (5.7864, -46), (5.9264, -56),
          (5.956, -50), (6.0914, -54), (6.1609, -52.5), (6.2444, -52), (6.79, -53), (6.8832, -40),
          (6.8425, -48), (7.924, -49), (7.9788, -50), (8.0022, -53), (8.025, -49), (8.0471, -49),
          (8.1304, -43), (8.3794, -52), (8.9296, -50), (9.0264, -56), (9.08, -45), (9.1887, -48),
          (9.3664, -47)]
FLECK_DB, FLECK_SHEEN_DB = 11, 9.5


def flecks():
    out = blank()
    fleck = band(click(4000), 3500, 16000)
    fleck = fleck + natural_amplitude(FLECK_SHEEN_DB) * band(fleck, 6100, 15500)
    for (s, db), (turn, twin) in zip(FLECKS, rng.random((len(FLECKS), 2))):
        add(out, natural_amplitude(db + FLECK_DB) * sides(6 * turn - 1) * fleck, s + .0007)
        add(out, natural_amplitude(db + FLECK_DB - 5 - 6 * twin) * fleck, s + .0062)
    return out[:, LEAD:]


# (time [s], length [s], level [dB], low [Hz], high [Hz])
SCUFFS = [
    (1.846, 0.072, -66, 1200, 4500),
    (5.7595, 0.05, -45.5, 1700, 7040),
    (6.195, 0.042, -54.5, 5100, 8800),
    (9.304, 0.087, -52.5, 2900, 5000),
    (9.41, 0.12, -57, 360, 1330),
    (4.765, .016, -52, 2800, 15000),
    (2.318, 0.039, -55.5, 4800, 6700),
    (2.394, 0.052, -55.5, 3200, 8500),
]


def scuffs():
    out, t = blank(), np.arange(SR // 2) / SR
    for (s, length, db, low_hz, high_hz), grit in zip(SCUFFS, rng.standard_normal((len(SCUFFS), 2, len(t)))):
        abrupt = np.clip(6 * length, .2, 1)
        stroke = np.sin(np.pi * np.minimum(t / length, 1) ** abrupt)
        add(out, natural_amplitude(db) * rms_one(band(grit + 1.2 * grit[0], low_hz, high_hz)) * stroke, s)
    return out[:, LEAD:]


def scene():
    rustle_db, trickle_db, wind_db = stir()
    yard = blows() + diffuse(rustle_db, trickle_db) + engines() + wind(wind_db)
    glass = crumbs(trickle_db) + chimes() + chip_pings() + slivers() + ticks() + flecks() + scuffs()
    return yard + glass


def band_limit(x):
    return signal.sosfilt(signal.butter(12, 15760, fs=SR, output="sos"), x)


MIC_LOW_HZ, MIC_EDGE_HZ, MIC_HIGH_HZ, MIC_TOP_DB = 72, 6550, 14700, -18.5


def record(dry):
    x = signal.sosfilt(signal.butter(3, MIC_LOW_HZ, "high", fs=SR, output="sos"), dry)
    body = signal.sosfilt(signal.butter(8, MIC_EDGE_HZ, fs=SR, output="sos"), x)
    top = signal.sosfilt(signal.butter(4, MIC_EDGE_HZ, "high", fs=SR, output="sos"), x)
    top = signal.sosfilt(signal.butter(8, MIC_HIGH_HZ, fs=SR, output="sos"), top)
    return band_limit(body + natural_amplitude(MIC_TOP_DB) * top)


dry = scene()
out = record(dry)
persist_wave(out)
```